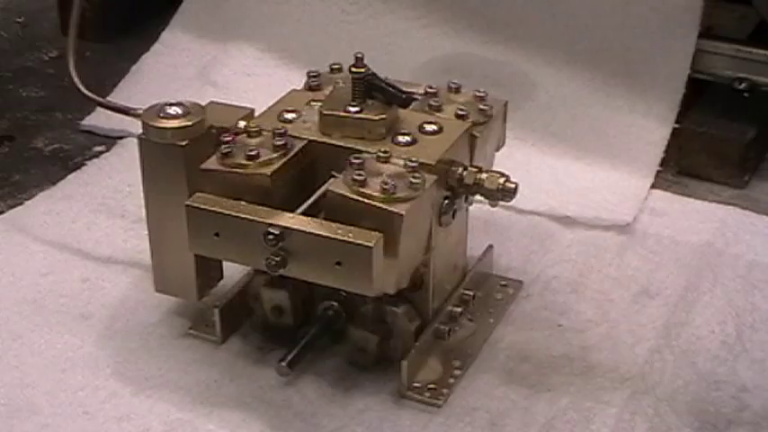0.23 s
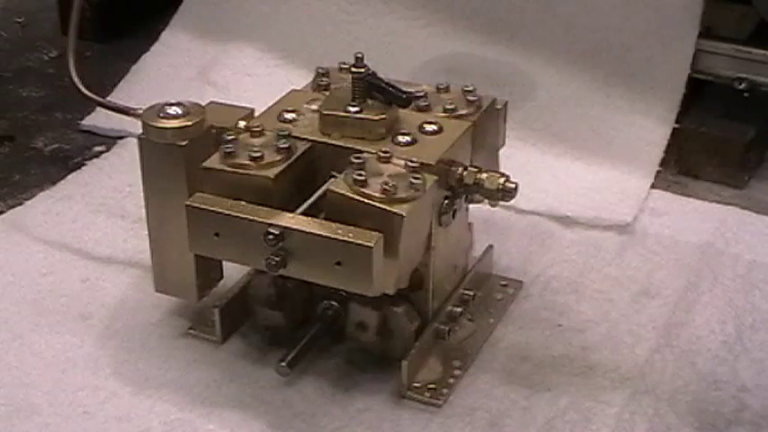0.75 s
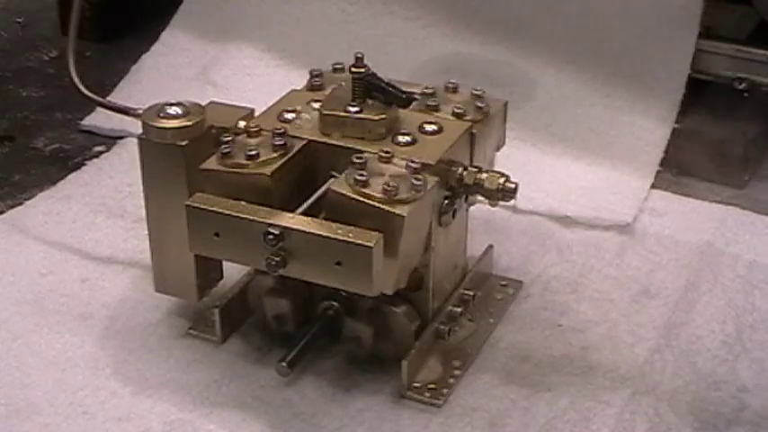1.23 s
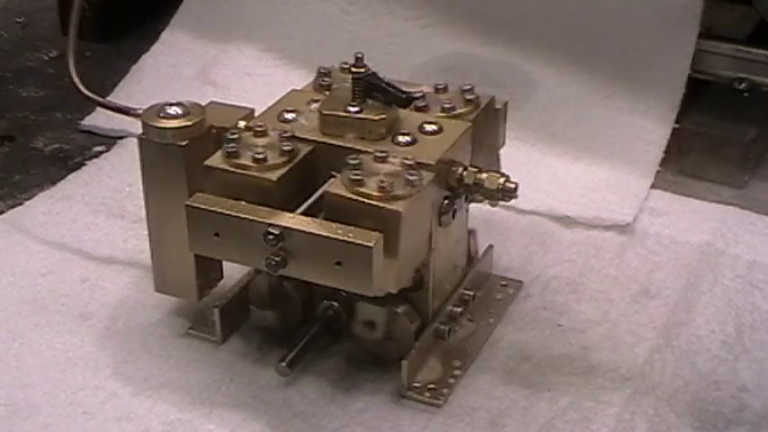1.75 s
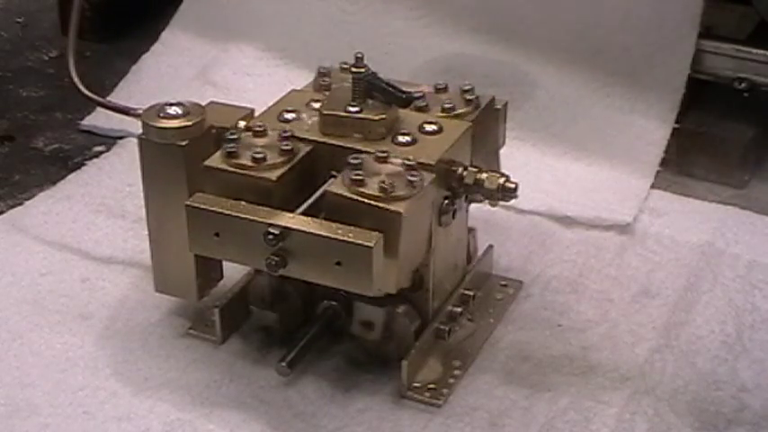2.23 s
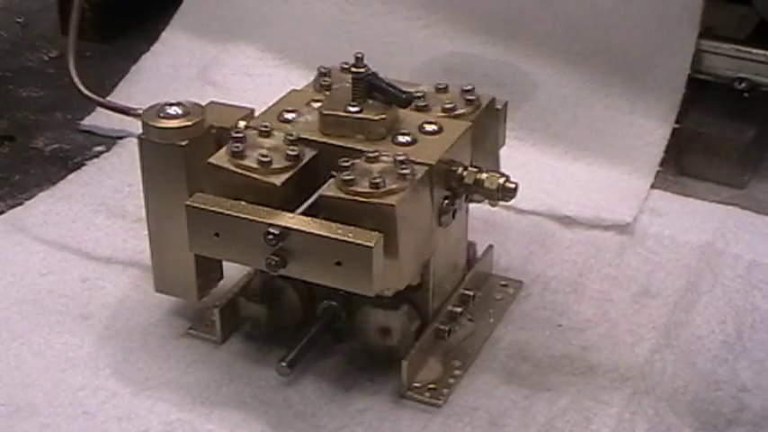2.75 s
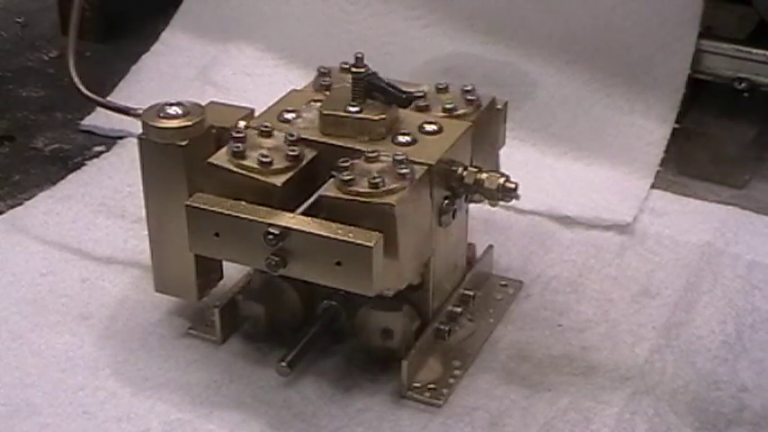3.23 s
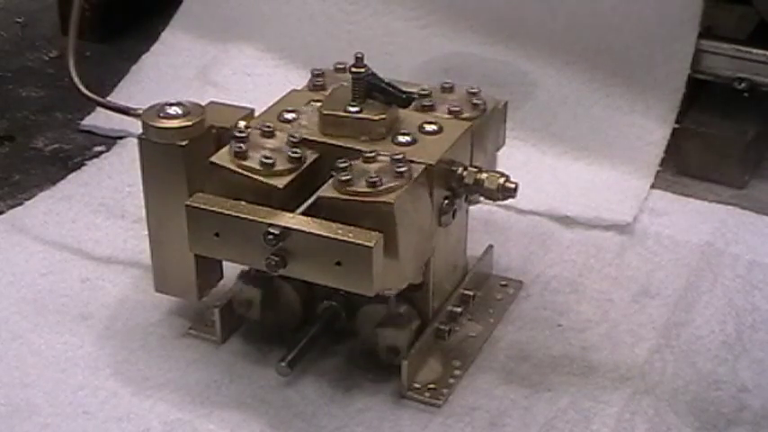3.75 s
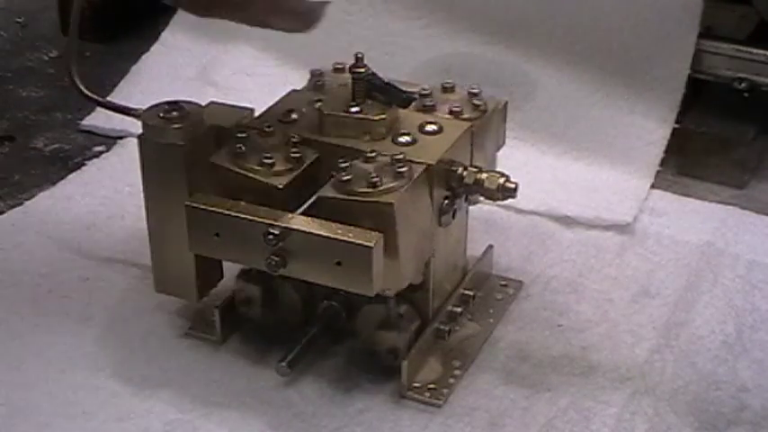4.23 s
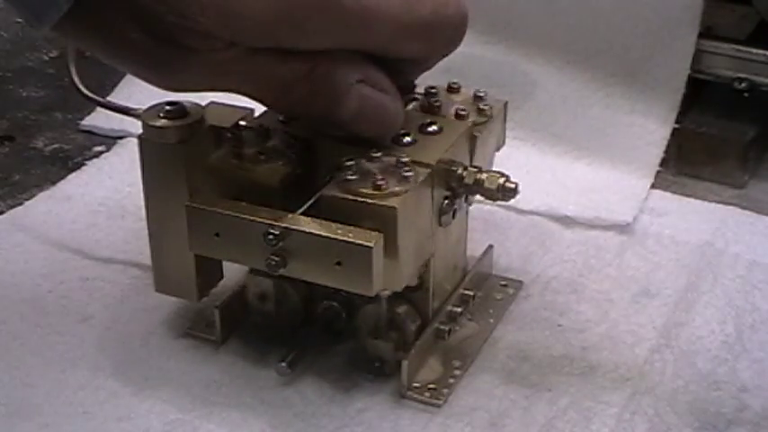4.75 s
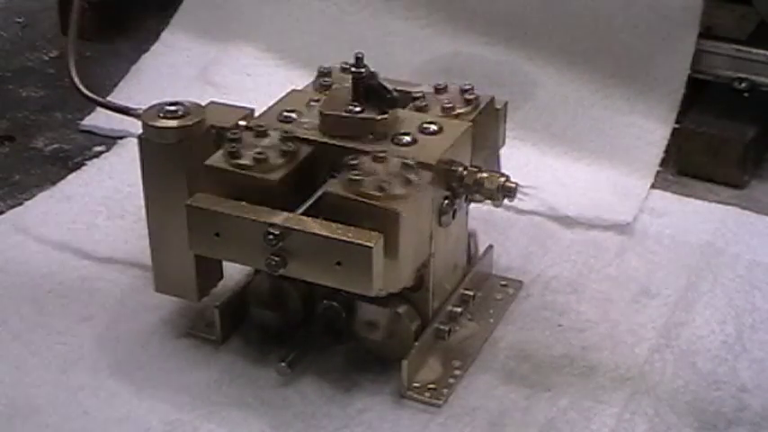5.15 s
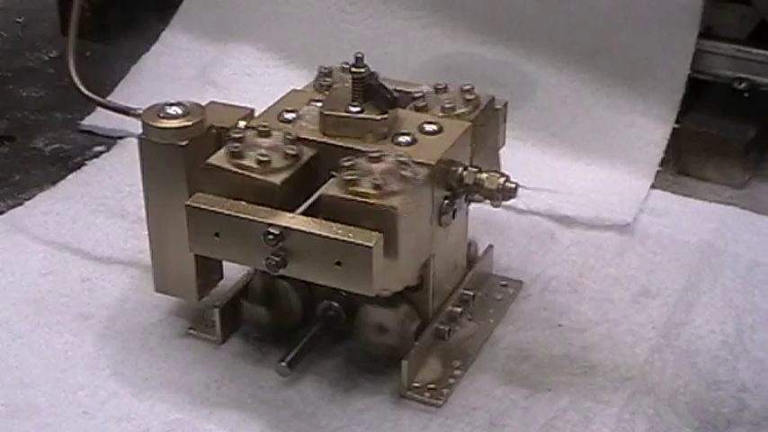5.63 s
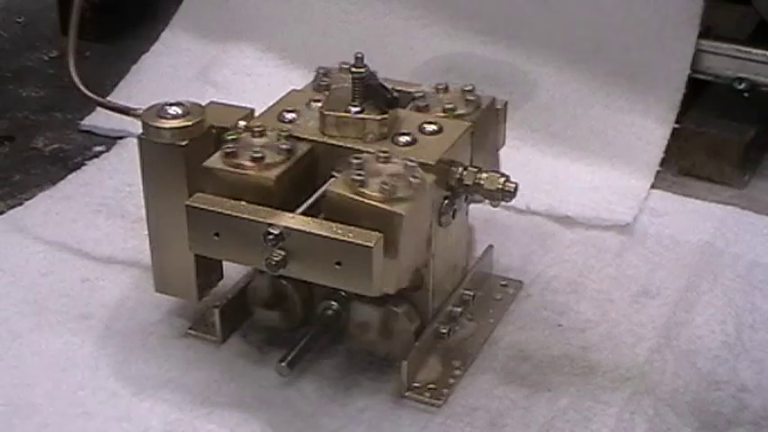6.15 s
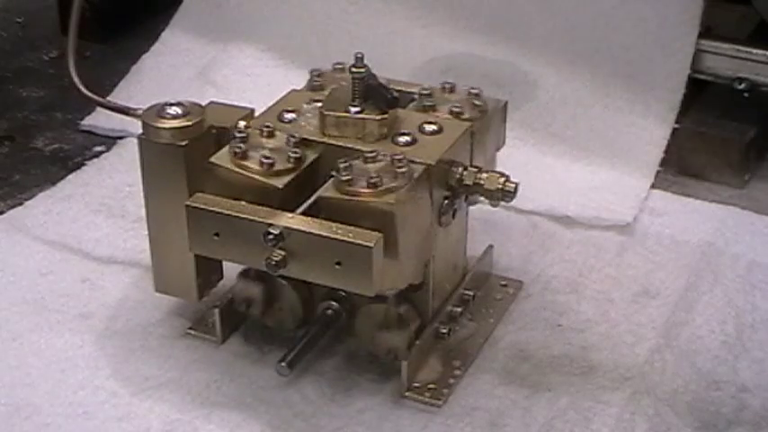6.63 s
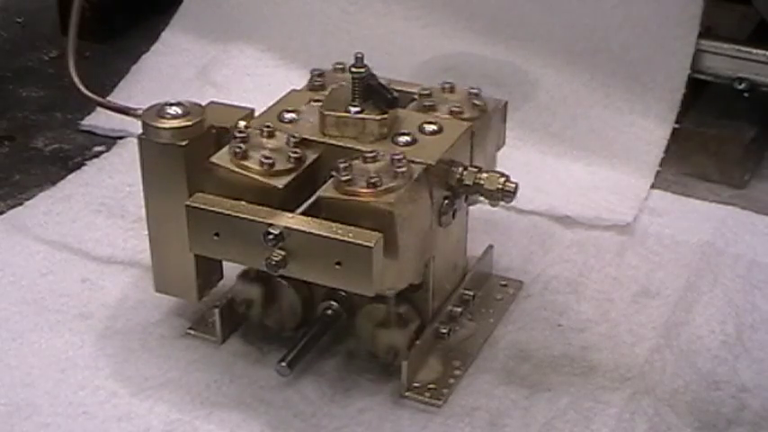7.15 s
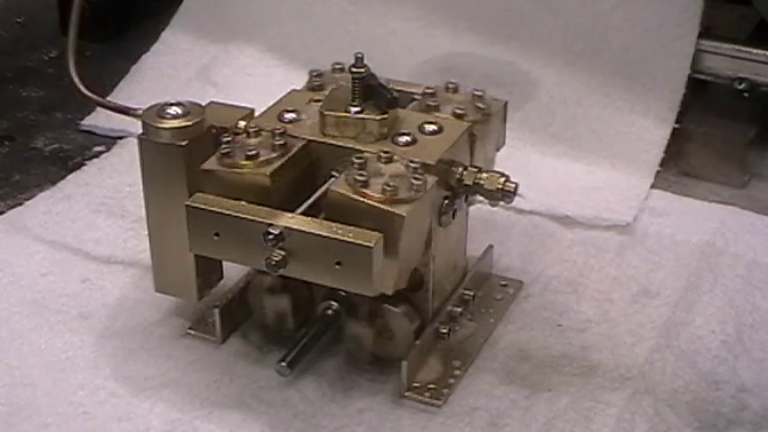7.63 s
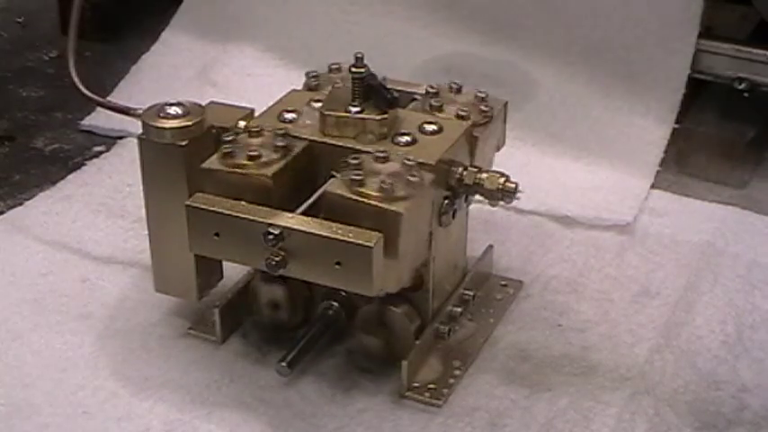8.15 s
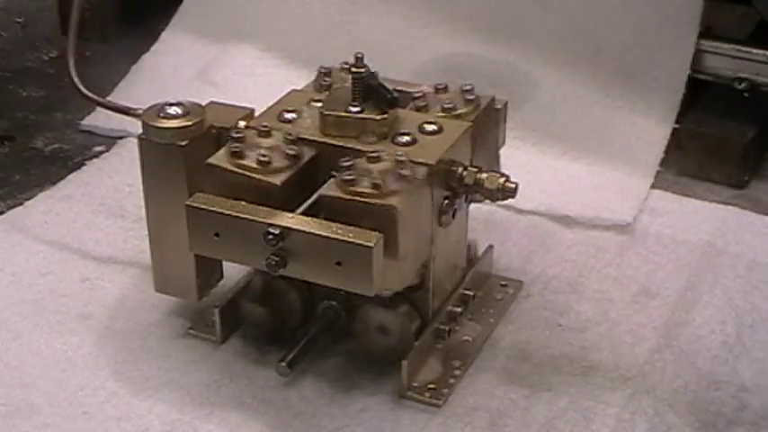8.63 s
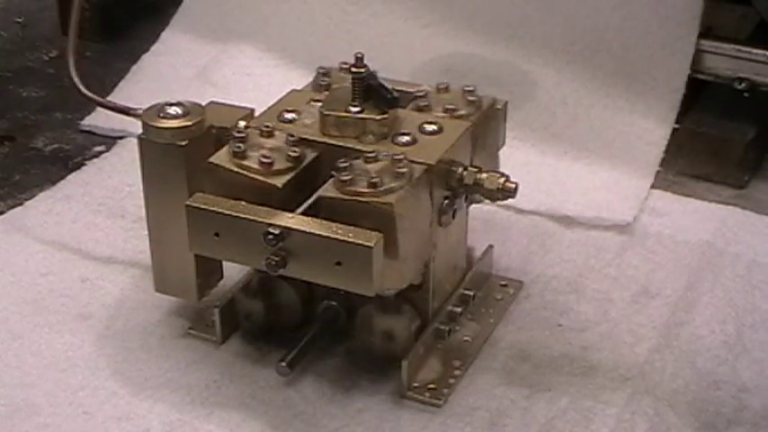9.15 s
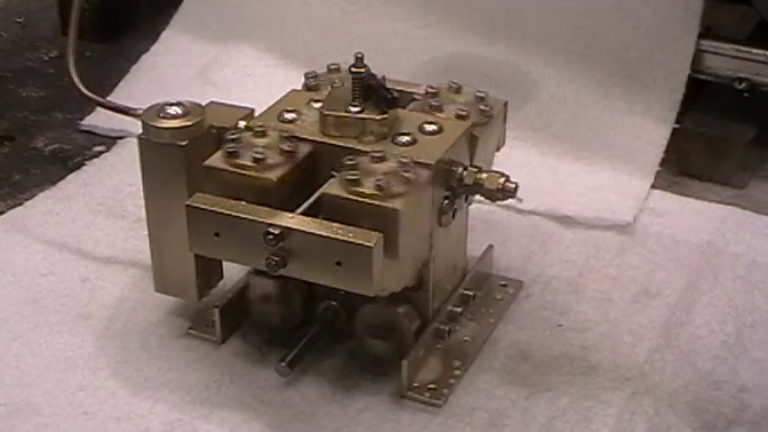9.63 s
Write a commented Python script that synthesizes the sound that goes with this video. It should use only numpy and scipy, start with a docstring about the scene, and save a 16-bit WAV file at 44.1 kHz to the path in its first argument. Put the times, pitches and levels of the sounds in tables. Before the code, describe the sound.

A small steam engine runs fast up close, a hollow fluttering roar under bright hiss; midway a lever clicks and the hiss sharpens and spits.

```python
"""On a cloth-covered bench, a small brass steam engine with rocking cylinders runs fast, heard close up.
Its exhaust beats blur into a hollow roar: noise pulsing at the beat rate, sent through pipe resonances.
Steam hisses at the port faces (resonant noise), water fizzes and spits (random drops and short noise bursts).
Halfway through, a hand moves the control lever: it clicks, the roar eases and a bright leak opens.
Bubbles ring as short tones that rise in pitch, over a faint room rumble."""
import sys
import numpy as np
from scipy.fft import rfft, irfft, next_fast_len
from scipy.io import wavfile
from scipy.ndimage import map_coordinates

SR = 44100
rng = np.random.default_rng(int(sys.argv[2]) if len(sys.argv) > 2 else 0)


def wav_record(signal):
    """Record a signal, one row per channel, as 16-bit PCM in the file named by sys.argv[1]."""
    frames = np.transpose(np.atleast_2d(signal))
    bounded = np.clip(frames, -1, 1)
    # unit amplitude maps onto the largest positive 16-bit level
    quanta = np.round(bounded * 32767).astype(np.int16)
    wavfile.write(sys.argv[1], SR, quanta)


N = 435708  # samples, about 9.9 s

# Levels inside a table are relative; each sound then sets its own overall level.
# exhaust pipe resonances, lower and upper: (f/Hz, width/Hz, level/dB)
PIPE_LOW_MODES = [(108.5, 20, -26), (146, 17, -25.0), (174.6, 20.3, -15.5), (209, 18.7, -17),
                  (253, 25, -20.5), (303.7, 12, -18.5), (348, 17.6, -14.5), (386, 35, -19.4),
                  (451, 24, -8.5), (500, 9, -9.5), (554, 55, -3.5), (597.3, 28.4, -1), (683.7, 44.5, -0.5),
                  (728.4, 23.4, 0.0), (764, 36, -7), (871, 23, -15), (937, 43, -22)]
PIPE_HIGH_MODES = [(1031, 18, -7), (1136.3, 46, 1), (1274, 150, -8.5), (1445, 80, -9), (1635, 166, -23),
                   (1843, 115, -8), (1946, 36, -7), (2082, 45, -0.8), (2128, 89, -6)]
# resonances of the steam escaping at the port faces: (f/Hz, width/Hz, level/dB)
PORT_MODES = [(2555, 120, -14.5), (2750, 64, -10.5), (3174, 97, -13), (3509, 2900, -17), (4260, 40, -10),
              (4615, 110, -7.5), (4887, 113, -3.5), (5754, 75, -3), (5870, 550, -9), (6660, 412, -15.5),
              (7200, 337, -12.5), (7430, 27, -2), (7680, 45, -4), (7910, 63, 1), (8140, 186, 1.5),
              (8432, 66, -4), (8940, 320, -10.5), (9650, 83, -9), (9900, 220, -11.5), (10640, 220, -5),
              (11200, 245, -10.5), (11659, 310, -10.5), (12460, 434, -16.5), (13430, 749, -22.7),
              (14503, 766, -21.5)]
# resonances of the leak at the control valve: (f/Hz, width/Hz, level/dB)
VALVE_MODES = [(6290, 510, -9.5), (7235, 280, -3.9), (7620, 30, 0), (7850, 54, -7), (7940, 100, -1),
               (8090, 91, 2.5), (8300, 250, -3.5), (8920, 400, -5.5), (9660, 90, -7), (9850, 190, -4.5),
               (10570, 240, -2.5), (11260, 380, -9), (11651, 251, -8), (12407, 421, -10), (13290, 581, -16),
               (14300, 1141, -15.5)]
# short lifts of the valve off its seat, letting steam blow: (start t/s, level/dB)
VALVE_BLOWS = [(1.05, -22), (4.745, -24), (4.93, -18.5)]
# slow rise and fall in loudness of the steam: (t/s, level/dB)
STEAM_SWAY = [(0.0, 0.1), (0.66, 0.5), (1.56, -1.5), (1.92, 0.9), (2.16, -0.4), (3.3, -0.0), (3.9, -0.7),
              (4.08, 1.0), (4.68, -0.2), (4.74, 1.1), (5.46, -1.1), (5.76, 0), (6.72, 0.13), (8.22, -0.34),
              (8.64, 0.9), (8.94, -0.3), (9.12, 0.3), (9.87, 0.1)]
# surges of water carried out with the steam: (start t/s, length/s, level/dB)
WATER_SURGES = [(0.232, 0.033, -27.5), (0.563, 0.12, -29), (1.058, 0.069, -26.5), (1.85, .2, -38),
                (2.286, .1, -25), (2.442, 0.13, -30), (2.69, .1, -33), (3.23, .05, -30),
                (4.033, 0.074, -30), (4.26, .14, -27.5), (4.75, .04, -31), (4.94, 0.043, -25),
                (5.136, .045, -21), (5.258, 0.3, -23.5), (5.55, 0.34, -22.5), (6.026, 0.066, -25),
                (6.155, 0.15, -26), (6.41, 0.19, -26), (6.69, 0.044, -24), (6.96, 0.077, -22),
                (7.21, 0.05, -22.5), (7.56, 0.19, -28), (7.87, 0.073, -27), (8.213, 0.085, -23.5),
                (8.953, .06, -25.5), (9.263, 0.071, -25), (9.504, .07, -21.5), (9.62, 0.15, -27.5)]
# tone colour of the spray: (f/Hz, level/dB)
SPRAY_TONE = [(300, -60), (1000, -39), (1600, 0.5), (2400, -10.5), (4000, -9), (5300, -4), (6200, -0.5),
              (7300, 4), (8500, 1), (10000, -13), (15000, -31)]
# reflections from nearby surfaces: (delay/s, gain as a plain factor)
NEAR_ECHOES = [(.00111, .2), (.0058, .3)]
# slugs of condensed water spat out: (t/s, level/dB)
WATER_SPITS = [(1.0674, -5), (1.1288, -8), (2.3496, -3), (2.7074, -8), (4.354, -8), (5.4404, -7),
               (5.5009, -3), (5.8157, -7), (6.4374, -4), (7.2544, -6), (9.6394, -6)]
# larger bubbles ringing in the oily water: (t/s, level/dB, f/Hz)
LARGE_BUBBLES = [(0.5546, -17, 3400), (0.5654, -24, 4270), (0.5926, -16, 3700), (1.3828, -23, 4100),
                 (1.5998, -24, 4240), (3.6202, -24, 2730), (4.1619, -24, 3980), (4.2852, -19, 3060),
                 (6.0277, -22, 3830), (6.0541, -19, 2960), (6.4038, -18, 3820), (7.1756, -24, 3650)]
# clicks of the linkage and the control lever: (t/s, level/dB)
LEVER_CLICKS = [(2.894, -15), (4.8463, -10), (4.865, -8), (4.9657, -13), (5.1486, -11), (8.1209, -15)]
# ringing tones of the brass parts: (f/Hz, level/dB, time to fall 60 dB/s)
BRASS_MODES = [(1380, -9, 0.028), (1644, 2, 0.037), (1840, -0.5, .03), (2780, -10, 0.019)]
# tone colour of the workshop background: (f/Hz, level/dB)
WORKSHOP_TONE = [(10, -4), (30, -2), (70, -2), (130, 4), (400, -11.5), (2000, -9), (12000, -27)]
# left-right difference sound: (f/Hz, level/dB against the middle)
STEREO_SIDE = [(30, 1), (70, -1), (130, -21), (300, -17), (500, -26), (740, -26), (950, -11), (1150, -20),
               (2100, -17.5), (3200, -54), (4400, -61), (6200, -46), (7600, -17.5), (11000, -8),
               (15000, -10.5)]
# how the two microphone ports differ in loudness: (f/Hz, left minus right level/dB)
PORT_TILT = [(110, -1.2), (400, -0.2), (750, -0.2), (1200, -1.3), (2100, 0.1), (3000, 0.1), (6500, 0.5),
             (8200, 0.6), (9300, 1), (9950, 8), (10450, 2), (10900, -0.5), (12400, -2.7), (15000, -.4)]
# how the two microphone ports differ in phase: (f/Hz, left lead/radians)
PORT_LEAD = [(6800, 0), (8200, -0.061), (9700, -.25), (10050, -.9), (10600, -1.25), (11400, -1.1),
             (12100, -0.54), (13000, 0.015)]

BEAT_HZ = 54.3  # average exhaust beats a second, four to a turn of the crank
LEVER_S, LEVER_TRAVEL_S = 4.905, 0.035  # when the lever opens the valve, and how long that takes
SURGE_ATTACK_S, SURGE_RELEASE_S = 0.017, 0.037  # a surge swells quickly and drains more slowly
BLOW_S, BLOW_ATTACK_S, BLOW_RELEASE_S = 0.033, 0.011, 0.015  # when the fall starts, rise time, fall time
TOP_HZ = 15700  # upper limit of the finished sound


def amp(db):
    """Turn decibels into a gain factor."""
    return 10 ** (np.asarray(db) / 20)


def unit(x):
    """Scale a sound to an average (rms) level of 1."""
    return x / np.sqrt(np.mean(x ** 2) + 1e-20)


def along(points, hz):
    """Read a curve of (f/Hz, value) points on a log frequency axis."""
    f, v = np.transpose(points)
    return np.interp(np.log(hz + 1), np.log(f + 1), v)


def wobble(rate):
    """Make a smooth random curve through `rate` random points a second."""
    knots = rng.standard_normal(int(N * rate / SR) + 4)
    return map_coordinates(knots, [np.arange(N) * rate / SR])


def filtered(x, response):
    """Shape a sound by a response that depends on frequency."""
    m = next_fast_len(N + SR // 4)  # spare room keeps the end from wrapping onto the start
    spectrum = rfft(x, m) * response(np.fft.rfftfreq(m, 1 / SR))
    return irfft(spectrum, m)[..., :N]


def resonate(x, modes):
    """Send a sound through steep-sided resonances whose powers add, then scale it to rms 1."""
    grid = np.arange(1, SR // 2, 2)
    skirt = np.sqrt(np.sqrt(2) - 1)  # makes the width a half-power width
    power = 0
    for hz, width, db in modes:
        offset = skirt * (grid ** 2 - hz ** 2) / (grid * width)
        power = power + (amp(db) / (1 + offset ** 2)) ** 2
    return unit(filtered(x, lambda f: np.interp(f, grid, np.sqrt(power))))


def turbulence():
    """Make two unrelated white noises: the middle and side sounds."""
    return rng.standard_normal((2, N))


def add(track, s, sound):
    """Mix a short sound into the track at time s."""
    part = track[..., max(round(s * SR), 0):][..., :sound.shape[-1]]
    part += sound[..., :part.shape[-1]]


def swell(start, length, attack, release):
    """Shape a level that rises, holds and, `length` seconds after its start, begins to die away."""
    t = np.arange(N) / SR - start
    return np.clip(t / attack, 0, 1) * np.exp(-np.maximum(t - length, 0) / release)


def beats(drift=0.06, uneven=0.31):
    """Swing the steam flow as the ports open; slower swings make the two cylinders slightly unequal."""
    phase = 2 * np.pi * np.cumsum(BEAT_HZ * (1 + drift * wobble(2))) / SR
    return np.cos(phase) + uneven * np.cos(phase / 2) + uneven * np.cos(phase / 4 + 1)


def steam_sway(flicker_db=0.62, flicker_rate=12):
    """Let the loudness of the steam rise and fall slowly and flicker a little, in dB."""
    slow_db = np.interp(np.arange(N) / SR, *np.transpose(STEAM_SWAY))
    return slow_db + flicker_db * wobble(flicker_rate)


def lever():
    """Open the control valve: 0 before the lever moves, 1 after."""
    return np.clip((np.arange(N) / SR - LEVER_S) / LEVER_TRAVEL_S, 0, 1)


def wetness(shut_db=-35.5, open_db=-30, waver_db=1.3, sputter_db=1.2):
    """Carry water in the steam: a trickle that grows when the valve opens, plus surges, all sputtering."""
    trickle = amp(shut_db + (open_db - shut_db) * lever() + waver_db * wobble(12))
    surge_power = 0
    for s, length, db in WATER_SURGES:
        surge_power = surge_power + (amp(db) * swell(s, length, SURGE_ATTACK_S, SURGE_RELEASE_S)) ** 2
    return np.sqrt(trickle ** 2 + surge_power) * amp(sputter_db * np.tanh(wobble(45)))


def exhaust(beat, sway_db, water, roar_db=-16.5, rasp_db=-23.0, roar_eased_db=-2.1, rasp_eased_db=-2.1,
            roar_beat_db=1.2, rasp_beat_db=1.24, roar_sway=0.38, rasp_sway=1.22, wet_rasp=2.6):
    """Puffs of steam sound the exhaust pipe; the open valve eases them and water makes them raspier."""
    roar = resonate(turbulence() * amp(roar_beat_db * beat), PIPE_LOW_MODES)
    rasp = resonate(turbulence() * amp(rasp_beat_db * beat), PIPE_HIGH_MODES)
    opening = lever()
    roar_gain = amp(roar_db + roar_eased_db * opening + roar_sway * sway_db)
    rasp_gain = amp(rasp_db + rasp_eased_db * opening + rasp_sway * sway_db)
    return roar_gain * roar + rasp_gain * (1 + wet_rasp * water) * rasp


def port_hiss(beat, sway_db, level_db=-22.9, eased_db=-2.0, beat_db=-0.32, flutter_db=1.04):
    """Steam slips between the rocking cylinders and their port faces, less once the valve is open."""
    flow = amp(beat_db * beat + flutter_db * wobble(40))
    hiss = resonate(turbulence() * flow, PORT_MODES)
    return amp(level_db + eased_db * lever() + sway_db) * hiss


def valve_leak(beat, sway_db, shut_db=-34, open_db=-20, creep_db_per_s=0.33, sway=1.6,
               beat_db=0.5, flutter_db=1.15):
    """A thin bright jet opens with the lever, slowly strengthens, and flutters; brief blows add to it."""
    flow = amp(beat_db * beat + flutter_db * wobble(60))
    open_s = np.maximum(np.arange(N) / SR - LEVER_S, 0)
    opening_db = shut_db + (open_db - shut_db) * lever()
    jet = amp(opening_db + creep_db_per_s * open_s + sway * sway_db)
    blows = sum(amp(db) * swell(s, BLOW_S, BLOW_ATTACK_S, BLOW_RELEASE_S) for s, db in VALVE_BLOWS)
    return np.hypot(jet, blows) * resonate(turbulence() * flow, VALVE_MODES)


def spray(beat, water, level_db=2.5, beat_db=0.9, clump_db=3.5, drops_per_s=5000, mist=0.28):
    """Tiny droplets burst in clumps over a fine mist; close reflections comb the fizz."""
    drops = np.sign(turbulence()) * (rng.random(N) < drops_per_s / SR)
    clumps = amp(beat_db * beat + clump_db * np.tanh(wobble(130)))

    def response(hz):
        comb = 1 + sum(gain * np.exp(-2j * np.pi * hz * delay) for delay, gain in NEAR_ECHOES)
        return amp(along(SPRAY_TONE, hz)) * comb

    fizz = filtered((drops + mist * turbulence()) * clumps, response)
    return amp(level_db) * water * unit(fizz)


def spits(level_db=-10.0, t60=0.05, rise=0.002, centre_hz=6800, octaves=0.55):
    """Each slug of water tears apart in a short burst of noise around one bright band."""
    out, t = np.zeros((2, N)), np.arange(4096) / SR
    f = np.fft.rfftfreq(len(t), 1 / SR) + 1
    colour = np.exp(-0.5 * (np.log2(f / centre_hz) / octaves) ** 2)
    for s, db in WATER_SPITS:
        burst = unit(irfft(rfft(rng.standard_normal((2, len(t)))) * colour))
        fade = amp(db + level_db - 60 * t / t60)
        add(out, s, burst * fade * (1 - np.exp(-t / rise)))
    return out


def bubbles(level_db=1.5, small_db=-32, small_hz=3400, cycles=70, glide=0.08, count=220):
    """Bubbles ring for some cycles and rise in pitch; many small ones lie under the few large ones."""
    out, t = np.zeros((2, N)), np.arange(2048) / SR
    small = []
    for u, v, w in rng.random((count, 3)):  # random time, level and pitch within one octave
        small.append((u * N / SR, small_db + 6 * v, small_hz * 2 ** (w - 0.5)))
    for s, db, hz in list(LARGE_BUBBLES) + small:
        age = t * hz / cycles  # reaches 1 when the ring has faded by 60 dB
        tone = np.sin(2 * np.pi * hz * t * (1 + glide * age))
        ring = tone * amp(-60 * age) * (1 - np.exp(-t / 0.0005))
        add(out[0], s, amp(db + level_db) * ring)  # middle only
    return out


def clicks(level_db=-7, crack=0.5, crack_t60=0.006):
    """Brass parts take up their play: a snap of noise and a well-damped ring."""
    out, t = np.zeros((2, N)), np.arange(4096) / SR
    for s, db in LEVER_CLICKS:
        ring = 0
        for hz, mode_db, t60 in BRASS_MODES:
            fade = amp(mode_db + rng.normal(0, 1.8) - 60 * t / t60)  # each strike differs a little
            ring = ring + fade * np.sin(2 * np.pi * hz * t)
        snap = crack * amp(-60 * t / crack_t60) * rng.standard_normal(len(t))
        add(out[0], s, amp(db + level_db) * (ring + snap))  # middle only
    return out


def workshop(level_db=-50):
    """The faint rumble of the room is noise weighted towards low frequencies."""
    return amp(level_db) * unit(filtered(turbulence(), lambda hz: amp(along(WORKSHOP_TONE, hz))))


def microphones(pair):
    """The middle reaches both ports alike, the side in opposition; each port has its own colour."""
    mid = pair[0]
    side = filtered(pair[1], lambda hz: amp(along(STEREO_SIDE, hz)))

    def both_ports(hz):
        left = amp(along(PORT_TILT, hz) / 2) * np.exp(0.5j * along(PORT_LEAD, hz))
        return np.array([left, 1 / left])  # half of each difference goes to each port

    return filtered(np.array([mid + side, mid - side]), both_ports)


def scene():
    """Mix all sources; the steam sounds share one beat and one sway, and water acts on exhaust and spray."""
    beat, sway_db, water = beats(), steam_sway(), wetness()
    steam = exhaust(beat, sway_db, water) + port_hiss(beat, sway_db) + valve_leak(beat, sway_db)
    condensate = spray(beat, water) + spits() + bubbles()
    return microphones(steam + condensate + clicks() + workshop())


def record(dry):
    """Keep nothing at or above the upper frequency limit."""
    return filtered(dry, lambda hz: hz < TOP_HZ)


dry = scene()
out = record(dry)
wav_record(out)
```